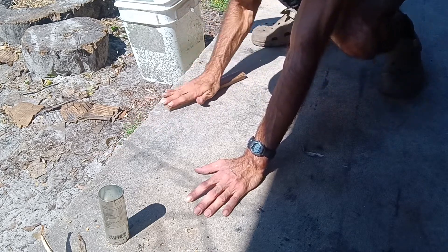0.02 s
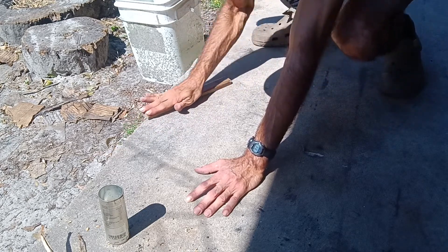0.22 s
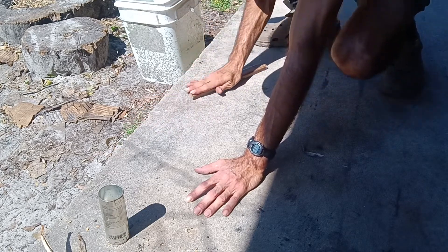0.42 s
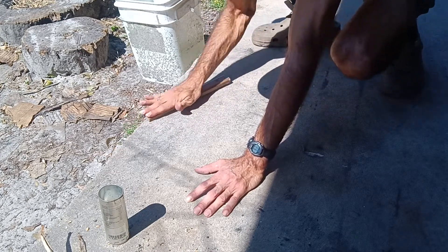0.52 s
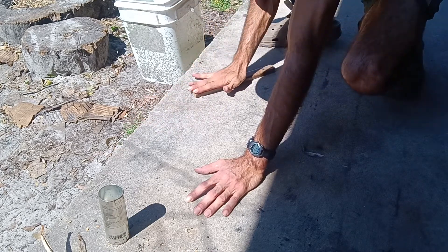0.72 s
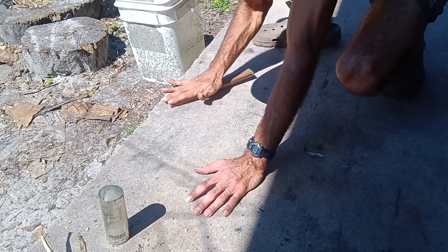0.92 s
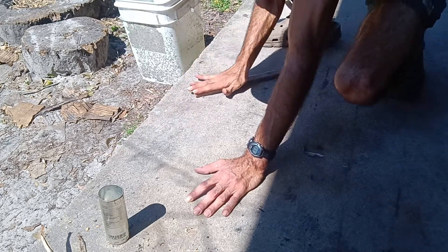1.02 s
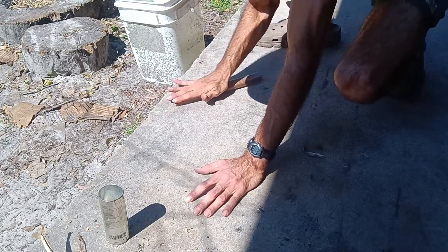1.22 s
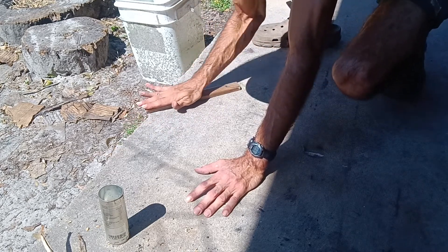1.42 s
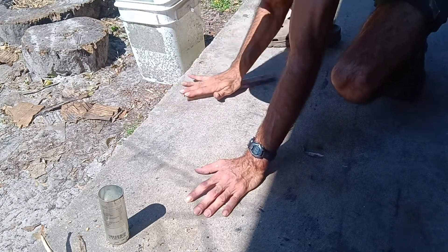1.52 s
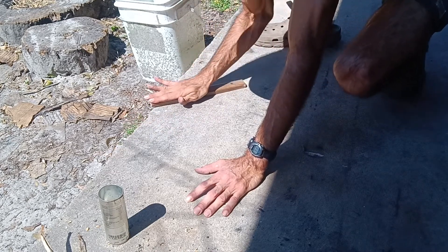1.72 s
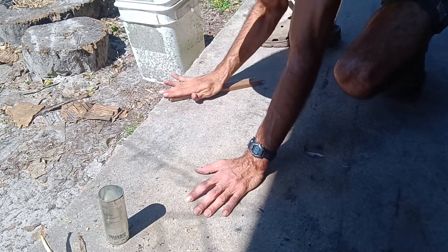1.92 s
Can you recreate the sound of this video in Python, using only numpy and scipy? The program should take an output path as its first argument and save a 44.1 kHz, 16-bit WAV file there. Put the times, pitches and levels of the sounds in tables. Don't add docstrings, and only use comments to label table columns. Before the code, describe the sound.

Wood scrapes and knocks briskly to and fro on a concrete slab outdoors, then fades to faint rubbing

```python
import sys
import numpy as np
from scipy import signal
from scipy.fft import rfft, irfft
from scipy.io import wavfile
from scipy.ndimage import uniform_filter1d

SR = 44100
rng = np.random.default_rng(int(sys.argv[2]) if len(sys.argv) > 2 else 0)


def to_wav(s):
    ch = np.atleast_2d(s).T
    pcm = np.round(np.clip(ch, -1, 1) * 32767)
    wavfile.write(sys.argv[1], SR, pcm.astype(np.int16))


def boost(x):
    u = np.asarray(x, float) / 20
    return 10 ** u


N = 88200
BOARD_LIKENESS = 0.85


def unit(x):
    return x / np.sqrt(np.mean(x ** 2))


def cut(x, hz, kind, order=4):
    return signal.sosfilt(signal.butter(order, hz, kind, fs=SR, output="sos"), x)


def pan(db):
    return boost(np.array([[db / 2], [-db / 2]]))


def ring(x, hz, t60):
    radius = np.exp(-np.log(1000) / (max(t60, 0.001) * SR))
    pole = radius * np.exp(2j * np.pi * hz / SR)
    gain = np.sqrt(2 * (1 - radius ** 2))
    return signal.lfilter([gain + 0j], [1, -pole], x).imag


def walk(rate):
    hold = int(SR / rate)
    steps = np.repeat(rng.standard_normal(300), hold)[:N]
    return 1.8 * uniform_filter1d(uniform_filter1d(steps, hold), hold)


def slips(rate, spread_db, bed_db, likeness):
    when = rng.random(N) < rate / SR
    size = boost(np.minimum(spread_db * rng.exponential(size=N), 13))
    common, *own = rng.standard_normal((3, N))
    bed = boost(bed_db + 2.17 * walk(90)) * common
    both = unit(when * size * np.sign(common)) + bed
    apart = 4.4 * uniform_filter1d(np.abs(both), size=9) * np.array(own)
    return unit(np.sqrt(likeness) * both + np.sqrt(1 - likeness) * apart)


def stroke(at, rise, fall):
    t = np.arange(N) / SR - at
    return np.exp(-np.where(t < 0, (t / rise) ** 2, (np.abs(t) / fall) ** 1.614))


def around(at):
    return slice(max(int(at * SR) - 5000, 0), int(at * SR) + 9000)


def bending():
    # peak in seconds, rise in seconds, fall in seconds, level in dB, tone in Hz.
    bends = [(0.0, .01, 0.031, -53.5, 1823), (0.181, 0.011, 0.015, -51, 1464),
             (0.22, 0.0079, 0.024, -42, 1842), (0.286, 0.044, 0.044, -41, 1956),
             (0.325, 0.012, 0.023, -53.5, 866), (0.384, 0.0085, 0.036, -31.5, 2040),
             (0.498, 0.022, 0.09, -37.5, 1915), (0.557, 0.043, 0.027, -38, 1890),
             (0.548, 0.043, 0.021, -52, 1000), (0.613, 0.017, 0.022, -41, 2034),
             (0.684, 0.0044, 0.026, -44, 2364), (.8, 0.022, 0.057, -47.5, 1580),
             (0.976, 0.015, 0.037, -32.5, 2188), (1.007, 0.038, 0.016, -37.5, 1987),
             (1.098, 0.004, 0.094, -50.5, 1590), (1.181, 0.0064, 0.028, -38.5, 2320),
             (1.294, 0.039, 0.023, -47.5, 2250), (1.339, 0.0022, 0.024, -46.5, 1532),
             (1.41, 0.011, 0.053, -45, 1772), (1.442, 0.015, 0.034, -48.5, 1610),
             (1.592, 0.054, 0.056, -64.5, 1553), (1.692, 0.0069, 0.063, -43.5, 1812),
             (1.86, 0.046, 0.064, -68, 1610), (1.99, 0.026, .05, -60.5, 1810),
             (.03, 0.037, 0.015, -62.5, 503), (1.14, 0.029, 0.013, -59.5, 700),
             (1.83, 0.022, 0.036, -62, 874), (1.82, 0.0046, 0.018, -69, 1850),
             (1.91, 0.0088, 0.022, -56.5, 1610)]
    slip_s, tone_s = 0.0073, 0.027
    split, side_db = 0.053, -6.5
    pushes = [slips(150, 1.7, -1, BOARD_LIKENESS) for _ in range(3)]
    out = np.zeros((2, N))
    for at, rise, fall, db, tone_hz in bends:
        part = around(at)
        shape = stroke(at, rise, fall)[part] * boost(db - 15)
        for push, side in zip(pushes, (0, 1, -1)):
            hz = tone_hz * (1 + split * side)
            soft_push = ring(push[:, part] * shape, hz, slip_s)
            out[:, part] += boost(side_db * abs(side)) * ring(soft_push, hz, tone_s)
    return out


def rasp():
    # peak in seconds, rise in seconds, fall in seconds, level in dB, tilt in dB per octave.
    strokes = [(0.0, 0.03, 0.025, -42, 2), (0.177, 0.0055, 0.017, -53.5, -16.5),
               (.265, 0.051, 0.041, -41.5, 2.5), (0.321, 0.0025, 0.032, -59.5, -15),
               (0.388, 0.0087, 0.035, -27.5, 0), (0.488, 0.014, 0.023, -37.5, -11.5),
               (0.542, 0.021, .06, -34, -5), (.692, 0.014, 0.031, -46, 6), (0.791, 0.0029, 0.04, -37.5, -7),
               (0.856, 0.044, 0.042, -43.5, 14), (1.001, 0.024, 0.032, -27.5, -7.5),
               (1.111, 0.014, 0.06, -32, 21), (1.182, 0.0078, 0.018, -33, -10),
               (1.269, .008, 0.019, -56, 11), (1.296, 0.018, 0.021, -48, 14.5),
               (1.344, 0.014, 0.013, -48, -19), (1.453, 0.038, 0.03, -39.5, 16.5),
               (1.554, 0.014, 0.04, -52, 29), (1.6, 0.018, 0.031, -44, -8),
               (1.712, 0.017, 0.039, -44.5, 14.5), (1.878, 0.03, 0.035, -45, -10),
               (2.0, 0.025, 0.042, -53.5, 23), (.73, 0.04, 0.037, -56.5, -5), (1.837, 0.02, 0.043, -63, 13),
               (1.762, 0.025, 0.017, -51, 28), (1.205, 0.0083, .025, -44, -11.5)]
    # level in dB against the rasp, tilt in dB per octave.
    stroke_grit = [(-14, -4), (-16, -7), (-15, 14.5), (-15, 4), (-9.5, -5.5), (-28, 3), (-25, 15),
                   (-13.5, -5), (-38, 9), (-5, 8), (-8, -2.5), (-15.5, 3), (-9.5, -5), (12.5, 4), (-11, -3),
                   (-11, -21), (-3.5, -3), (3.5, -7), (-7, -15.5), (-5, -1), (-7.5, -7), (1, -6), (-9.5, 8),
                   (4, 6), (-3.5, 22), (-33, 7)]
    # frequency in Hz, level in dB, t60 in seconds.
    board_modes = [(643, -33.5, 0.16), (1000, -19.5, 0.0098), (1580, -19, 0.091), (1911, -12.5, 0.035),
                   (2450, -69, 0.021), (3193, -4, 0.021), (3525, 2, 0.02), (3900, -7, 0.015),
                   (4570, -0.5, 0.0055), (5045, -2, 0.013), (5380, 2.5, 0.012), (5985, -5.5, 0.033),
                   (7250, -50, 0.019)]
    # frequency in Hz, level in dB, t60 in seconds.
    grit_modes = [(6900, -1, 0.0019), (7550, 0.5, 0.0057), (8250, -6, 0.005), (9840, 0, 0.0042),
                  (11500, -2, 0.0021), (12650, -9, 0.0017), (14650, -11.5, 0.0039), (15500, -12, 0.0047)]
    grip_shift, recolour_db = 0.012, 1.5
    board_low_hz, board_top_hz = 1510, 6320

    board_slips = slips(700, 2.1, -0.49, BOARD_LIKENESS)
    grit_slips = slips(2000, 3.4, -5, 0.75)
    board, grit_pushes = np.zeros((2, N)), np.zeros((len(grit_modes), N))
    chance = rng.standard_normal((len(strokes), 2, len(board_modes)))
    flickers = [boost(3 * walk(70.11)) for _ in board_modes]
    grit_octaves = np.log2(np.array(grit_modes)[:, :1] / 10000)
    for (at, rise, fall, db, tilt), (grit_db, grit_tilt), (shifts, colours) in zip(strokes, stroke_grit, chance):
        part = around(at)
        shape = stroke(at, rise, fall)[part]
        grit_pushes[:, part] += shape ** 1.3 * boost(db + grit_db - 5 + grit_tilt * grit_octaves)
        for (hz, mode_db, t60), shift, colour, flicker in zip(board_modes, shifts, colours, flickers):
            level = boost(db + mode_db - 10.5 + tilt * np.log2(hz / 4300) + recolour_db * colour)
            push = board_slips[:, part] * (shape * flicker[part])
            board[:, part] += level * ring(push, hz * (1 + grip_shift * shift), t60)

    grit = np.zeros((2, N))
    for (hz, db, t60), push in zip(grit_modes, grit_pushes):
        side = pan(10 * np.log2(hz / 6900))
        patches = boost(db + 3 + 3 * walk(40))
        grit += side * patches * ring(ring(grit_slips * push, hz, t60 / 3) / 4, hz, t60)
    board = cut(cut(board, board_low_hz, "high"), board_top_hz, "low")
    return board + cut(grit, board_top_hz, "high")


def yard():
    # frequency in Hz, density in dB per Hz.
    spectrum = [(30, -28), (56, -24), (90, -0.5), (300, -6.5), (700, -9.5), (2000, -21), (6000, -23),
                (16000, -36)]
    f = np.fft.rfftfreq(N, 1 / SR) + 1
    hz, db = np.array(spectrum).T
    shape = boost(np.interp(np.log(f), np.log(hz), db))
    mid, side = rfft(rng.standard_normal((2, N))) * shape
    width = np.clip(f / 1200, 0.2, 0.8) * np.array([[1], [-1]])
    return unit(irfft(mid + side * width, N)) * boost(-63 + 0.79 * walk(6.4))


def hum():
    # frequency in Hz, level in dB, left minus right in dB.
    harmonics = [(120.5, -58, 1.5), (359.7, -63, -7.5)]
    t = np.arange(N) / SR
    out = np.zeros((2, N))
    for hz, db, left_db in harmonics:
        level = boost(db + 1 + 1.28 * walk(4.6))
        out += pan(left_db) * level * np.sin(2 * np.pi * hz * t + 0.1 * walk(9.3))
    return out


def breeze():
    # time in seconds, level in dB.
    gusts = [(0.0, -65), (0.32, -78), (0.44, -74), (0.7, -79), (0.77, -65), (0.92, -89), (1.08, -60),
             (1.11, -82), (1.19, -56), (1.28, -87), (1.55, -61), (1.7, -89), (1.86, -64.5), (2.0, -91)]
    both, own = rng.standard_normal(N), rng.standard_normal((2, N))
    rumble = unit(cut(cut(both + 0.46 * own, 43, "high"), 86, "low"))
    return rumble * boost(np.interp(np.arange(N) / SR, *np.array(gusts).T))


def knocks():
    # start in seconds, level in dB, centre in Hz, spread in octaves, ring t60 in seconds.
    hits = [(0.1734, -26.5, 5460, 0.068, 0.015), (.174, -37.5, 3620, 0.11, 0.026),
            (0.2607, -28, 5030, 0.31, 0.011), (0.3157, -30, 2450, 0.22, .02),
            (0.38, -30, 3520, 0.38, 0.016), (0.3866, -17, 4100, 0.84, 0.012), (0.405, -21, 6000, 1, .006),
            (.395, -17.5, 3230, 0.16, 0.011), (0.476, -12, 2960, 0.26, 0.013),
            (.477, -15.5, 1870, 0.15, 0.047), (0.4767, -24, 960, 0.14, 0.014),
            (.4765, -40.5, 614, 0.089, 0.075), (.533, -19, 2600, 0.42, 0.011),
            (0.6008, -20, 2030, 0.17, 0.029), (.601, -26, 3960, 0.48, 0.016),
            (0.6753, -37, 2050, 0.11, .02), (0.686, -27, 2280, 0.15, 0.017), (.687, -24.5, 5450, 0.59, .01),
            (0.6967, -19.5, 5800, 0.5, 0.0062), (0.6962, -30, 2690, 0.15, 0.0066),
            (0.7777, -9.5, 3580, 0.34, 0.023), (0.777, -19, 1700, 0.18, 0.019),
            (0.8607, -33, 5400, 0.26, 0.023), (.987, -20.5, 3300, .4, 0.015),
            (1.018, -21, 3900, 0.29, 0.0083), (1.0974, -5, 4540, 0.31, 0.015),
            (1.0974, -30, 1590, .07, 0.027), (1.175, -24, 6500, 0.9, 0.01),
            (1.183, -22, 3130, 0.093, 0.026), (1.182, -28.5, 2400, 0.2, 0.015),
            (1.191, -32.5, 2410, .1, 0.012), (1.2679, -40, 7600, .15, 0.019),
            (1.2762, -22.5, 2350, 0.11, 0.0063), (1.2915, -29, 2340, 0.15, 0.014),
            (1.3359, -24, 2700, 0.77, 0.0091), (1.597, -39, 3700, 0.1, 0.045),
            (1.757, -43, 5400, 0.46, 0.0066), (1.8145, -52, 2500, 0.72, .02),
            (1.886, -42, 3200, 0.095, 0.051)]
    # frequency in Hz, level in dB.
    struck_modes = [(614, -16), (1000, 7), (1585, 2.5), (1935, 3.5), (2400, -3), (3075, 3), (3540, 1),
                    (3950, -10.5), (4600, -2), (5000, -9), (5450, 5), (6130, -14), (7600, 1)]
    crack_db, crack_s, crack_top_hz = -9, 0.001, 14600
    out, t = np.zeros((2, N + 8192)), np.arange(4096) / SR
    chance = rng.standard_normal((len(hits), 3, len(struck_modes), 1))
    noise = rng.standard_normal((len(hits), 2, len(t)))
    modes, struck_db = np.array(struck_modes).T[:, :, None]
    for (at, db, hz, spread, t60), (size, side, detune), hiss in zip(hits, chance, noise):
        nearness = np.exp(-0.5 * (np.log2(modes / hz) / spread) ** 2)
        gain = nearness * boost(struck_db + 1.5 * size)
        contact_s = np.clip(0.000022 / spread ** 2, 0.0001, 0.002)
        fade = np.exp(-np.log(1000) * t / t60) * (1 - np.exp(-t / contact_s))
        phase = 2 * np.pi * modes * (1 + 0.0029 * detune) * t
        ports = [(gain * np.sin(phase + sign * 0.67 * side)).sum(axis=0) for sign in (1, -1)]
        tone = np.array(ports) * fade
        tone = cut(tone / np.abs(tone).max(), hz / 3, "high", order=2)
        crack = cut(cut(hiss, hz / 2, "high", order=2), crack_top_hz, "low", order=2)
        crack = crack * np.exp(-t / crack_s) * boost(crack_db) * spread ** 2
        i = int(at * SR)
        out[:, i:i + len(t)] += boost(db) * (tone + crack)
    return out[:, :N]


def echoes(near):
    t = np.arange(8192) / SR
    tail = rng.standard_normal((2, 8192)) * np.exp(-np.log(1000) * t / 0.07) * (t > 0.002)
    tail = tail / np.sqrt((tail ** 2).sum() / 2)
    return boost(-19) * signal.fftconvolve(near, tail, axes=1)[:, :N]


def scene():
    # time in seconds, left minus right in dB.
    drift = [
        (0, .5),
        (.35, 0.5),
        (.6, 0),
        (1.1, -1),
        (1.5, -2.5),
        (2, -1),
    ]
    drift_db = np.interp(np.arange(N) / SR, *np.array(drift).T)
    near = (bending() + rasp() + knocks()) * boost(np.array([drift_db, -drift_db]) / 2)
    near = near + echoes(near)
    lag_s = 0.00004 * np.array([[1], [0]])
    lag = np.exp(-2j * np.pi * np.fft.rfftfreq(N, 1 / SR) * lag_s)
    return irfft(rfft(near) * lag, N) + yard() + hum() + breeze()


def roll_off(x):
    return signal.sosfilt(signal.butter(12, 16970, fs=SR, output="sos"), x)


def record(dry):
    low_pass = signal.ellip(8, 0.2, 60, 15900, fs=SR, output="sos")
    mix = signal.sosfilt(low_pass, dry)
    return roll_off(mix)


dry = scene()
out = record(dry)
to_wav(out)
```